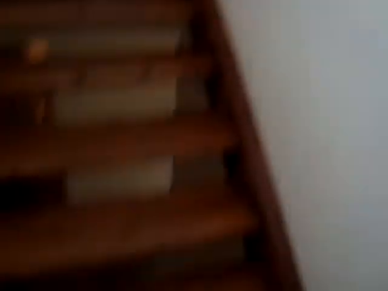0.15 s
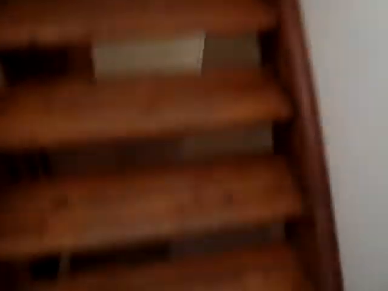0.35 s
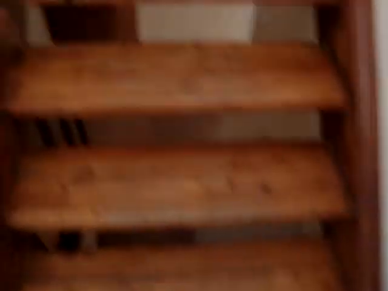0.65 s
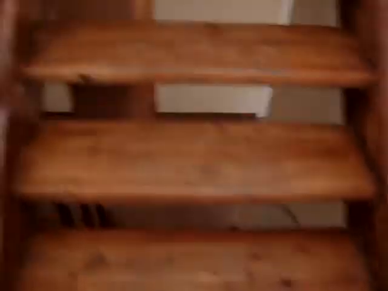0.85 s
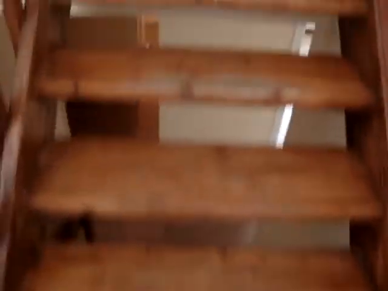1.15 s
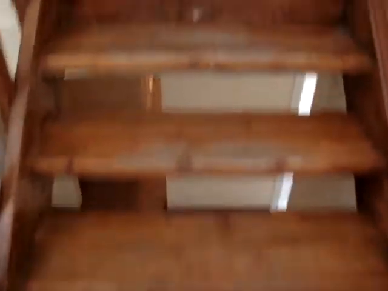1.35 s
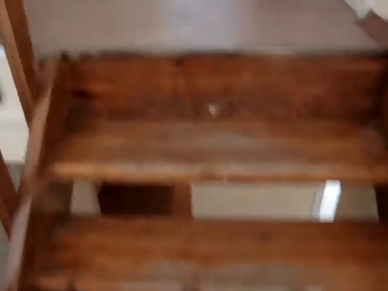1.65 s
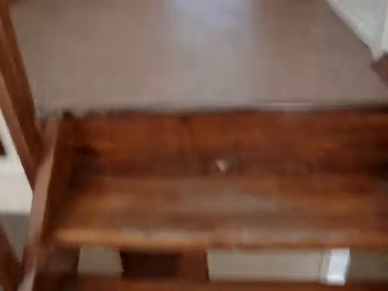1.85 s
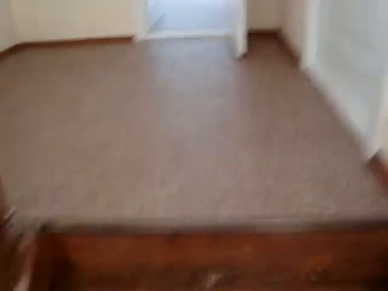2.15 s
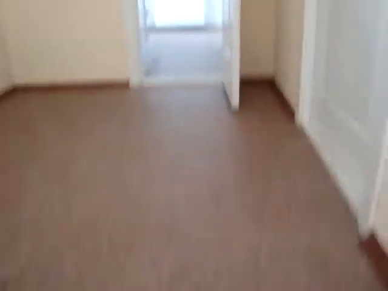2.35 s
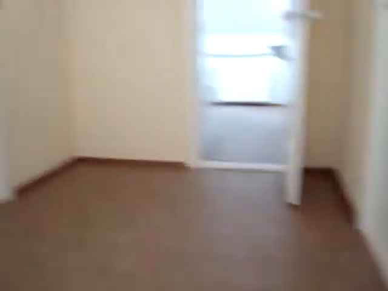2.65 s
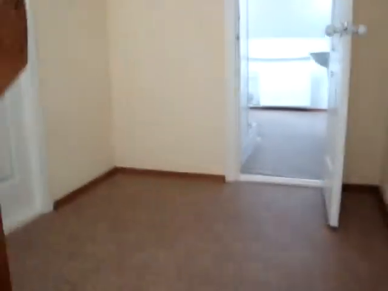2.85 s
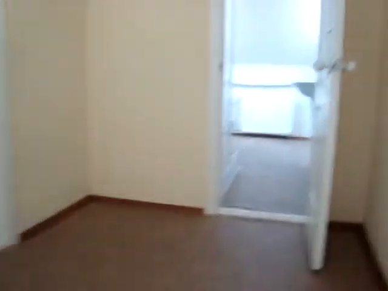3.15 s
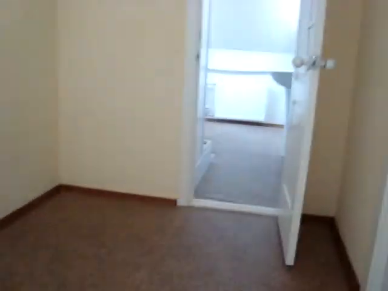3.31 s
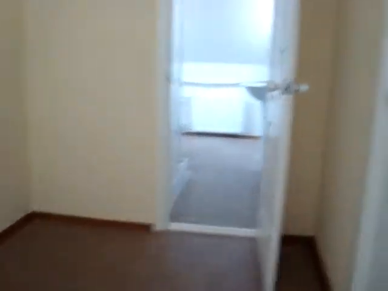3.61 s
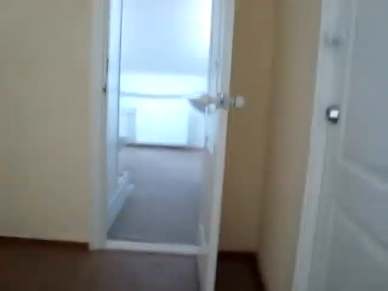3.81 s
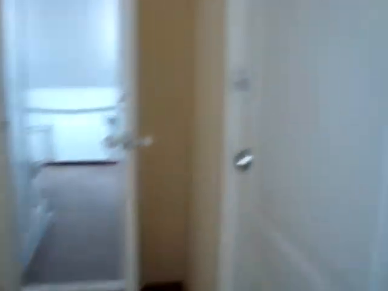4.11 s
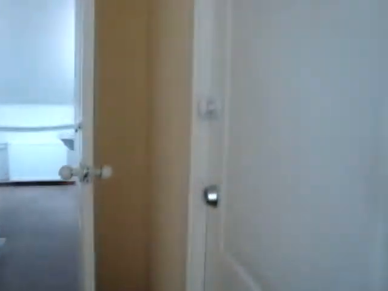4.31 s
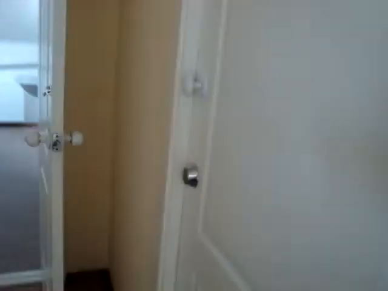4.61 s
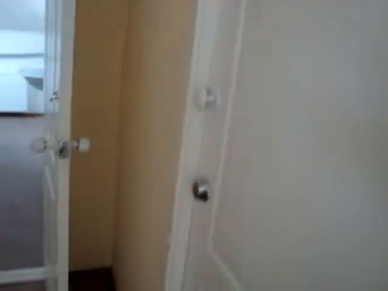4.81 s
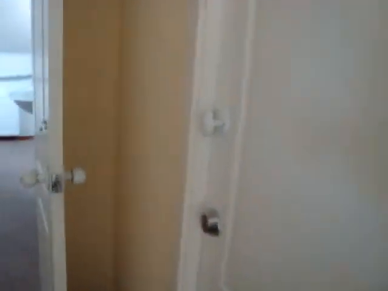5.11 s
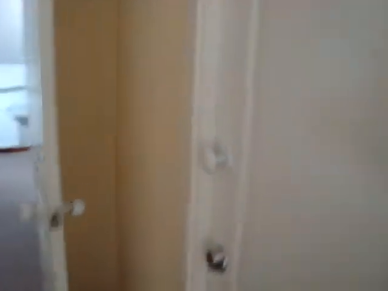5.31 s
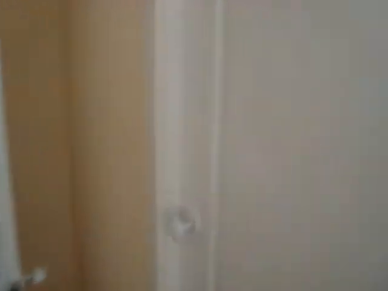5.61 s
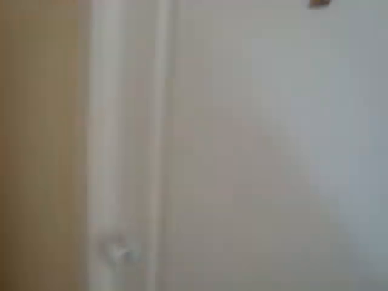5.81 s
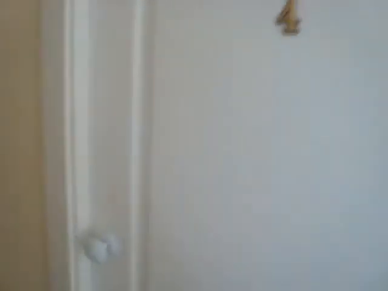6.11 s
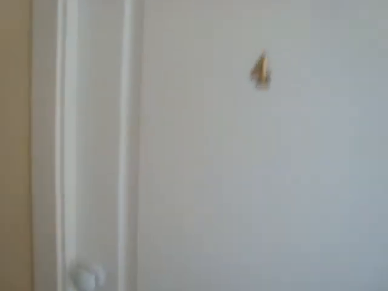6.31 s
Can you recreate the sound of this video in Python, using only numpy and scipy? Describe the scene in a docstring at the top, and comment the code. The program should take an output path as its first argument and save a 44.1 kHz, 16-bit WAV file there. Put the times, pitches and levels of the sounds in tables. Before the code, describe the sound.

Solitary footsteps in an empty, reverberant house interior, heard from a microphone carried by the walker. Hard heels knock on hollow boards, soles slap just behind, and faint brushes fill the gaps. Early on a dry click pops right beside the microphone. Around five seconds a deep thudding step clacks brightly, followed by a pause with gritty shuffles and a lighter closing step. Soft, steady air hiss lies underneath.

```python
"""Hard heels on a bare wooden landing

Someone in hard-heeled shoes climbs the last wooden stairs and crosses a bare landing.
Each heel is a short filtered knock; decaying modes make the boards ring and the floor thud under it.
Soles and extra shoe contacts are bursts of tiny grains; a loose hard piece clacks under the heaviest step.
The empty room echoes the steps over a soft hiss; something ticks twice right beside the microphone."""
import sys
import numpy as np
from scipy import signal
from scipy.io import wavfile
from scipy.ndimage import uniform_filter1d

SR = 44100
rng = np.random.default_rng(int(sys.argv[2]) if len(sys.argv) > 2 else 0)


def wrap_up_sound(samples):
    """Save the sound to the file named by the first command line argument, as 16-bit audio."""
    columns = np.atleast_2d(samples).T
    # keep every value between -1 and 1, then stretch to whole-number steps
    tamed = np.clip(columns, -1, 1)
    steps = np.round(tamed * 32767).astype(np.int16)
    wavfile.write(sys.argv[1], SR, steps)


N = 284886  # samples, about 6.5 s

# footsteps, levels relative within each layer: start_s, heel_db, knock_centre_hz, edge_click_db,
# floor_thud_db, thud_centre_hz, lower_board_hz, upper_board_hz, board_ring_db, room_db, sole_db
FOOTSTEPS = [(0.5877, -8, 1126, -22, -1.5, 140, 442, 997, 1.5, 2.5, -9.5),
             (1.4146, 1, 1290, -46, -14, 220, 472, 1133, -7.5, 3, -8),
             (1.9893, 0, 1303, -22, -3.5, 168, 1124, 1430, -1.5, 0.5, -6.5),
             (2.5358, -6, 930, -18, 6.5, 135, 470, 1053, 2.5, 2.5, -14.5),
             (3.0969, -5, 1375, -33, 0, 149, 820, 1394, -7, -2, -9),
             (3.728, -9, 1100, -15.5, -4, 150, 512, 863, -2.5, 4, -7.5),
             (4.3482, -4.5, 1387, -18.5, 3.5, 210, 591, 1760, 0.5, 1, -13),
             (5.0792, -7.5, 1570, -5, 10, 94, 313, 1321, 2, 2.5, -4.5),
             (6.3419, -17.5, 2020, -9, 7, 134, 304, 2270, -1, 4.5, -18)]


def heels(level_db=8, thud_db=-13, board_db=-13, heel_ring_db=-11, heel_t60_s=0.0079,
          board_t60_s=0.081, ring_room_db=-7, weight_delay_s=0.01172):
    """Each heel knocks into the room and rings the board beneath it; the floor thuds as the weight follows."""
    # the floor on its joists: nominal_hz, level_db, t60_s
    joist_modes = [(57.7, -30, 0.22), (92.4, -23.5, 0.18), (131.3, -14.5, 0.18), (201.4, -21, 0.53),
                   (224.3, -12, 0.15), (321, -35, 0.13)]
    upper_mode_db = -1  # a board's upper mode, relative to its lower one
    thud_db_per_octave = 5.5  # the spot underfoot favours floor modes near the thud centre
    out = np.zeros(N)
    for (start_s, heel_db, centre_hz, edge_db, floor_db, thud_hz,
         lower_hz, upper_hz, ring_db, room_db, _) in FOOTSTEPS:
        board = ring(lower_hz, board_t60_s) + amp(upper_mode_db) * ring(upper_hz, board_t60_s)
        wood = amp(board_db + ring_db) * board + amp(heel_ring_db) * ring(centre_hz, heel_t60_s)

        # the floor is tuned a little differently under every step
        detunings = rng.uniform(0.95, 1.03, len(joist_modes))
        thud = 0
        for (hz, mode_db, t60_s), detuning in zip(joist_modes, detunings):
            octaves_away = abs(np.log2(hz / thud_hz))
            mode_gain = amp(mode_db - thud_db_per_octave * octaves_away)
            thud = thud + mode_gain * ring(hz * detuning, t60_s)
        add(wood, weight_delay_s, amp(thud_db + floor_db) * thud)

        # the boards radiate straight up at the microphone, so they sound drier than the knock
        step_gain = amp(level_db + heel_db)
        add(out, start_s, step_gain * room(wood, room_db + ring_room_db))
        add(out, start_s, step_gain * room(shoe(centre_hz, edge_db), room_db))
    return out


def soles(level_db=3):
    """After each heel the sole slaps down, and a little later the other foot pushes off with a faint brush."""
    # heel to push-off: earliest_s, latest_s
    push_off_delay = (.18, 0.33)
    sole_delay_s = 0.021  # from heel to sole
    push_off_db = -23.5
    out = np.zeros(N)
    for start_s, *_, sole_db in FOOTSTEPS:
        slap = rub(centre_hz=853, grit_db=-11.5, settle_s=0.032)
        add(out, start_s + sole_delay_s, amp(level_db + sole_db) * slap)
        brush = rub(centre_hz=1100, grit_db=-9.5, settle_s=0.009)
        add(out, start_s + rng.uniform(*push_off_delay), amp(level_db + push_off_db) * brush)
    return out


def extra_contacts(level_db=3):
    """Extra shoe contacts: gritty slaps, toe touches, scuffs and a low bump, all in grains that die away."""
    # contacts, levels relative to level_db: start_s, contact_db, centre_hz, grit_db, die_away_s
    shoe_contacts = [(0.135, -19, 1180, -7.5, 0.016), (0.630, -8.5, 1250, -5.5, 0.0024),
                     (0.91, -19.5, 201, -23, .019), (1.2575, -18, 1640, -10, 0.0015),
                     (1.430, -9, 1440, 4.5, 0.0014), (2.540, -11, 2130, -34, 0.0079),
                     (3.125, -16, 1200, 0, 0.014), (5.082, -12, 1500, 0, 0.0043),
                     (5.791, -19, 950, -5, 0.028), (5.85, -19, 1100, 2.5, 0.022),
                     (5.947, -14.5, 900, -5, 0.025), (6.341, -12, 2080, -8, .012),
                     (6.392, -10, 800, -9, .017)]
    out = np.zeros(N)
    for start_s, contact_db, centre_hz, grit_db, die_away_s in shoe_contacts:
        add(out, start_s, amp(level_db + contact_db) * rub(centre_hz, grit_db, die_away_s))
    return out


def rub(centre_hz, grit_db, settle_s, room_db=4, grains_per_s=4000, size=9000):
    """A shoe meets the floor in many tiny grains of contact that die away as it settles."""
    t = np.arange(size) / SR
    struck = rng.random(size) < grains_per_s / SR
    grains = rng.standard_normal(size) * struck * np.exp(-t / settle_s)
    grains /= np.linalg.norm(grains) + 1e-9
    return room(signal.fftconvolve(grains, shoe(centre_hz, grit_db)), room_db)


def shoe(centre_hz, grit_db):
    """One contact: harder parts of the shoe knock higher, and a sharp edge adds treble."""
    # the knock around its centre: multiple_of_centre, level_db
    knock_spectrum = [(.04, -43), (.12, -26.5), (.25, -11), (.42, -4), (.7, -1), (1, 3), (1.35, -0.5),
                      (1.75, -6.5), (2.8, -21), (4.5, -51), (9, -55.5)]
    # hard edge and grit on the floor: frequency_hz, level_db
    grit_spectrum = [(100, -38.5), (1000, -9.5), (2000, -5), (2400, -0.5), (3050, -0.5), (3700, -6),
                     (4250, -6.5), (5300, -8), (6150, -11.5), (7000, -12), (10000, -19)]
    hz = bins()
    knock = amp(read(knock_spectrum, hz / centre_hz))
    grit = amp(grit_db + read(grit_spectrum, hz))
    return pulse(np.hypot(knock, grit))


def clack(level_db=-17, room_db=0):
    """A loose hard piece bounces a few times under the heaviest step, and each blow rings its modes."""
    # the bounces: start_s, blow_db
    bounces = [(5.0783, 3), (5.0862, -6.5), (5.094, -12), (5.1015, -19)]
    # the piece's modes: mode_hz, mode_db, t60_s
    piece_modes = [(2350, -1, .06), (2450, 5, 0.031), (3020, 1, 0.034), (4230, -6, 0.05), (4500, -2, 0.031),
                   (4780, -10.5, .04), (6030, -6.5, 0.021)]
    blow = sum(amp(mode_db) * ring(hz, t60_s) for hz, mode_db, t60_s in piece_modes)
    blows = np.zeros(N)
    for start_s, blow_db in bounces:
        add(blows, start_s, amp(blow_db) * blow)
    return amp(level_db) * room(blows, room_db)[:N]


def tick(level_db=3, room_db=-20):
    """Small dry ticks, each with one quick rebound, too close to the microphone to stir the room much."""
    # ticks beside the microphone: start_s, tick_db
    tick_times = [(0.8097, -6), (4.1052, -22.5)]
    # a tick's spectrum: frequency_hz, level_db
    tick_spectrum = [(300, -31), (800, -13), (1200, 1.5), (2000, -1.5), (2600, -0.5), (3200, 0.5),
                     (4100, 4), (5000, -6), (7000, -15), (10000, -33)]
    rebound_s, rebound_db = 0.0023, -6.5
    click = pulse(amp(read(tick_spectrum, bins())))
    out = np.zeros(N)
    for start_s, tick_db in tick_times:
        sound = amp(level_db + tick_db) * room(click, room_db)
        add(out, start_s, sound)
        add(out, start_s + rebound_s, amp(rebound_db) * sound)
    return out


def hiss(level_db=-51.5, uneven_db=1.53):
    """Still air and microphone hiss: soft, slightly uneven shaped noise."""
    # the hiss spectrum, relative: frequency_hz, level_db_per_hz
    hiss_spectrum = [(25, -29), (60, -19), (100, -20), (140, -9), (200, -9), (420, -3.5), (880, -5.5),
                     (1400, -8.5), (2200, -11.5), (3000, -14), (4000, -13), (5500, -17.5), (10000, -23)]
    hz = bins(size=1024)
    real, imaginary, unevenness = rng.standard_normal((N // 256 + 5, len(hz), 3)).T
    unevenness = uniform_filter1d(unevenness, size=20, axis=0)  # smooth across frequency
    unevenness = evened(uniform_filter1d(unevenness, size=24, axis=1))  # smooth across time
    gain = amp(read(hiss_spectrum, hz)[:, None] + uneven_db * unevenness)
    noise = signal.istft((real + 1j * imaginary) * gain, nperseg=1024, noverlap=768)[1][:N]
    return amp(level_db) * evened(noise)


def room(x, room_db, build_s=0.0012, early_db=-4, early_s=0.0067, walls_db=-1, size=40000):
    """Direct sound, near walls and a dense tail; the paths change wherever the walker stands."""
    # the tail's decay: frequency_hz, t60_s
    tail_decay = [(100, 0.53), (260, 0.5), (700, 0.6725), (1800, 0.57), (4500, 0.63), (9000, 0.96)]
    # the tail's colour: frequency_hz, level_db
    tail_colour = [(60, 2.6), (150, 9), (300, 6), (450, 13.4), (700, 7.2), (1100, 8), (2000, 6.2),
                   (4000, 5.3), (9000, 1.6)]
    # nearest walls: nominal_delay_s, relative_gain (a plain factor)
    near_walls = [(.0017, 0.6), (.0042, 0.54), (.0085, 0.086), (0.0106, 0.19), (0.0139, .28), (.0195, 0.6),
                  (0.0234, 0.41)]
    t = np.arange(size) / SR

    # sparse random echoes, about 5000 a second, coloured and faded band by band
    echoes = rng.choice([-1., 1.], size) * (rng.random(size) < 5000 / SR)
    hz, age_s, z = signal.stft(echoes, SR, nperseg=256)
    decay = np.exp(-np.log(1000) * age_s / read(tail_decay, hz)[:, None])
    z = z * decay * amp(read(tail_colour, hz))[:, None]
    tail = signal.istft(z, SR, nperseg=256)[1][:size] / np.sqrt(250)

    # the landing fills at once and drains into the rest of the house
    tail *= 1 - np.exp(-(t / build_s) ** 2)
    tail *= 1 + amp(early_db) * np.exp(-t / early_s)

    shifts = rng.uniform(0.85, 1.15, len(near_walls))  # each wall a little nearer or farther
    for (delay_s, gain), shift in zip(near_walls, shifts):
        tail[int(delay_s * shift * SR)] += gain * amp(walls_db)
    tail *= amp(room_db)
    tail[0] += 1  # the direct sound
    return signal.fftconvolve(x, tail)


def ring(hz, t60_s, size=12000):
    """One mode of energy 1 that swells over its first cycle and dies away."""
    t = np.arange(size) / SR
    decay = np.exp(-np.log(1000) * t / t60_s)
    swell = 1 - np.exp(-(hz * t) ** 2)
    mode = np.sin(2 * np.pi * hz * t) * decay * swell
    return mode / np.linalg.norm(mode)


def pulse(gain):
    """The sharpest causal (minimum-phase) pulse that has this spectrum."""
    mirrored = np.r_[gain, gain[-2:0:-1]]
    log_gain = np.log(np.maximum(mirrored, 1e-5))
    spectrum = np.exp(np.conj(signal.hilbert(log_gain)))
    return np.fft.ifft(spectrum).real[:len(gain)]


def amp(db):
    """Decibels to an amplitude factor."""
    return 10 ** (np.asarray(db) / 20)


def evened(x):
    """Scale to an RMS of 1."""
    return x / np.sqrt(np.mean(x ** 2) + 1e-20)


def read(points, hz):
    """Straight lines between points on a logarithmic frequency axis."""
    f, value = np.transpose(points)
    return np.interp(np.log(hz + 1e-6), np.log(f), value)


def add(mix, start_s, sound):
    """Lay a sound into the mix in place, cut off where the mix ends."""
    part = mix[round(start_s * SR):][:len(sound)]
    part += sound[:len(part)]


def bins(size=4096):
    """Frequencies in Hz of a real spectrum of this size."""
    return np.fft.rfftfreq(size, 1 / SR)


def scene():
    """The walker, the clack, the ticks and the hiss on one channel."""
    return (heels() + soles() + extra_contacts() + clack() + tick() + hiss())[None]


def record(dry):
    """The recorder's steep band limit: a long low-pass filter."""
    cutoff_hz = 10120
    lowpass = signal.firwin(1023, cutoff_hz, window=("kaiser", 8), fs=SR)
    return signal.oaconvolve(dry, lowpass[None], "same")


dry = scene()
out = record(dry)
wrap_up_sound(out)
```